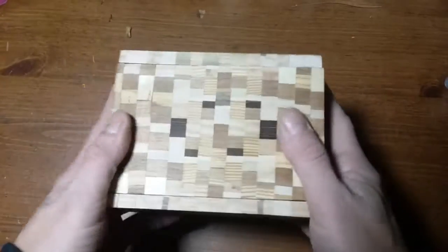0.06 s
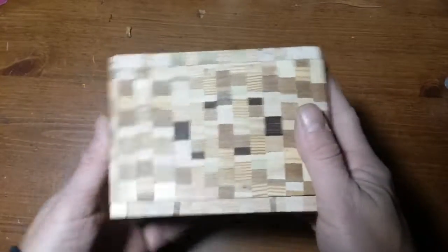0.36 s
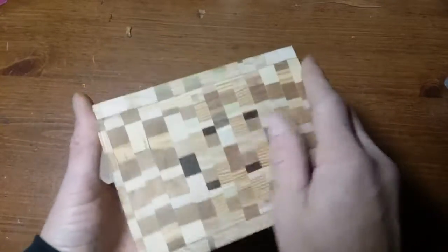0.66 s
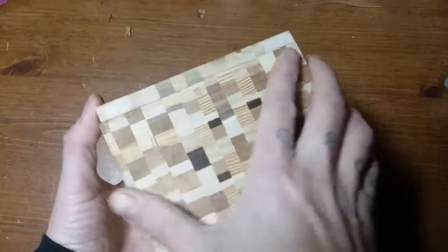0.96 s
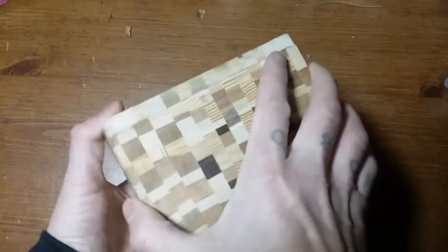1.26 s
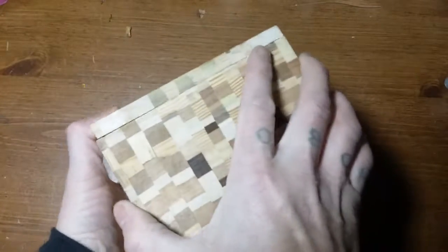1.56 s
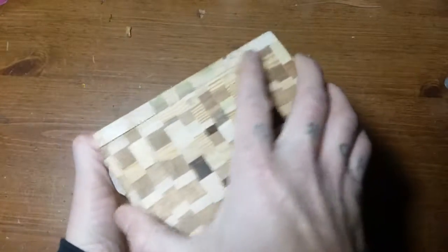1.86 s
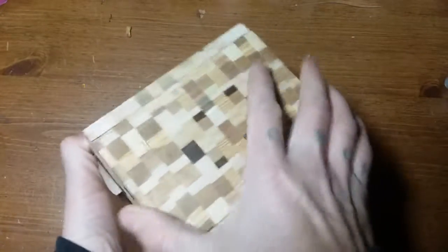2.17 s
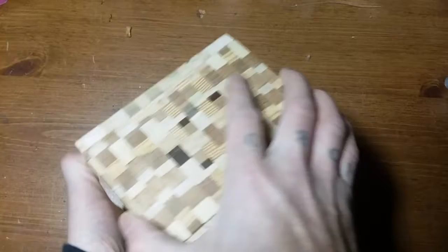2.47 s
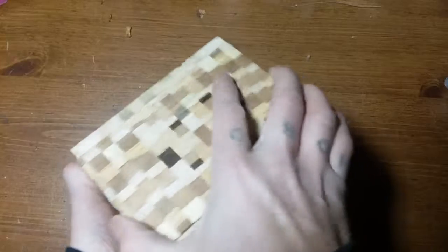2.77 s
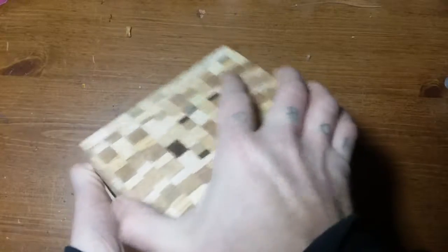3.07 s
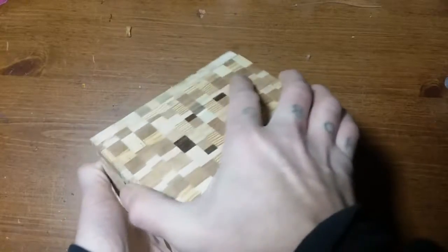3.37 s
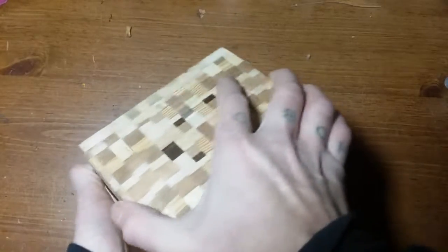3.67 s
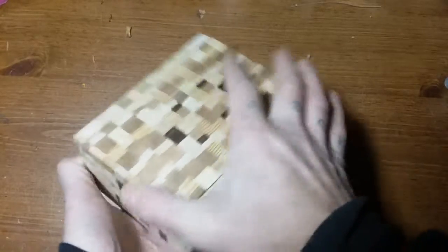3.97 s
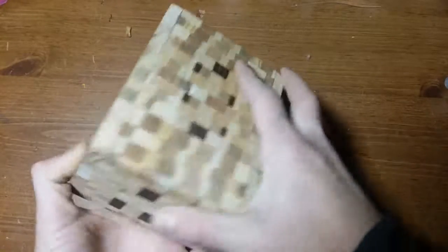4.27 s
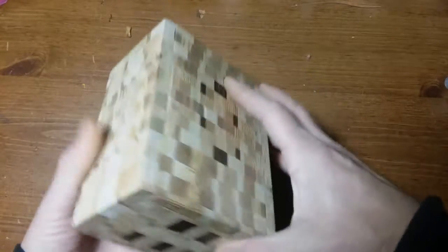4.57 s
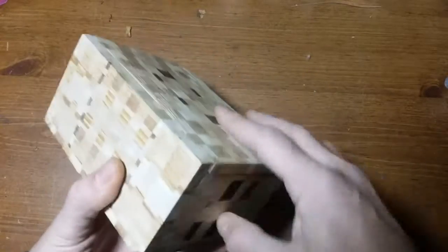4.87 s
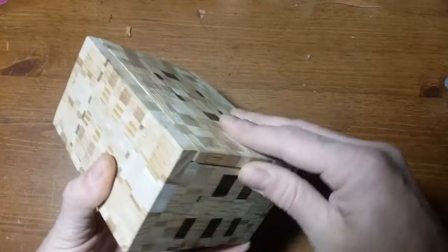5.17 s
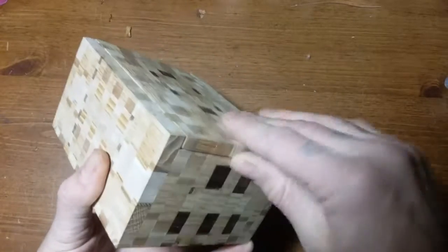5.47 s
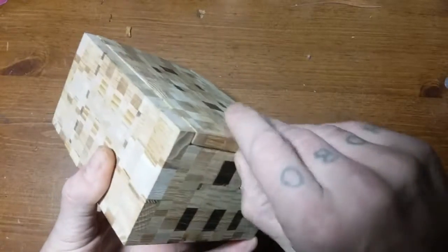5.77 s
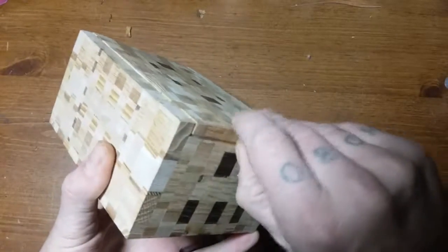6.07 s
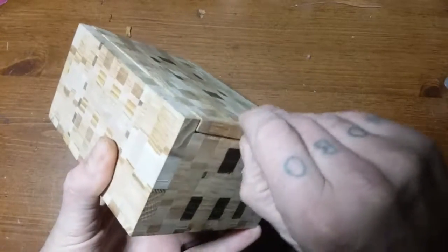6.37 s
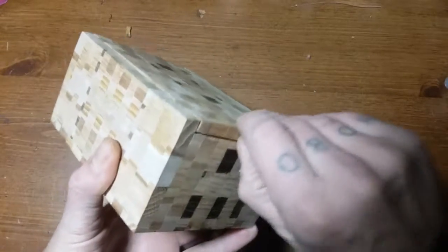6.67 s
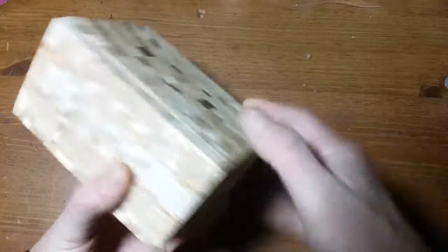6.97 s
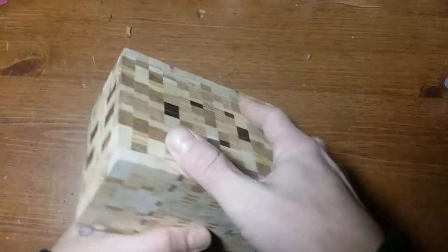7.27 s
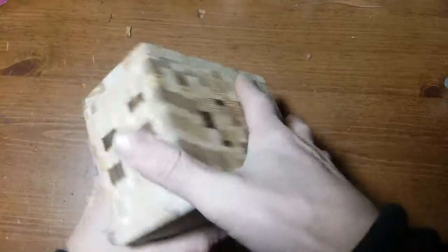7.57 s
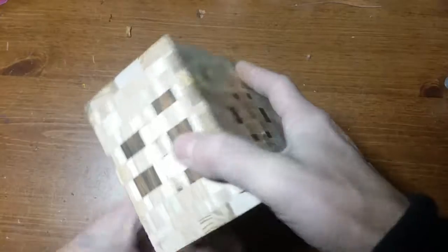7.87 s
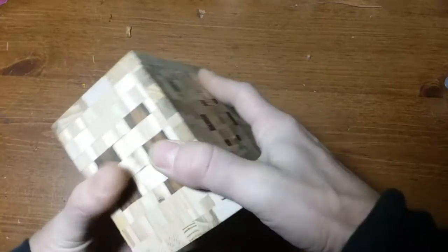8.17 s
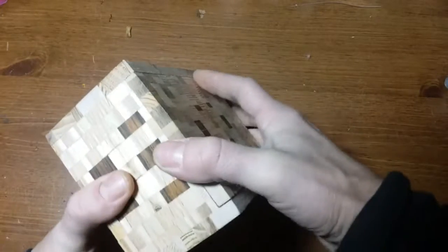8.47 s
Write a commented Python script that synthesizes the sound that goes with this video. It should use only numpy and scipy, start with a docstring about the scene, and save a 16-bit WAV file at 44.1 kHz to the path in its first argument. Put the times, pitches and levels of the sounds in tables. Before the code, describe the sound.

Loose pieces tick and knock inside a handheld wooden box as fingers softly rub and bump its sides.

```python
"""Loose pieces tick and knock inside a wooden puzzle box turned in two hands above a table in a small room.
Each impact excites the damped modes of cavity and panels. Fingers bump the box, an end panel booms
against its stop, a side panel grates in its groove and a pin drops with a short ring. Friction of skin
on wood gives a dry rubbing and one stick-slip squeak. A noise suppressor keeps the treble of the
steady background hiss lower between the knocks than during them."""
import sys
import numpy as np
from scipy import signal
from scipy.fft import rfft, irfft, next_fast_len
from scipy.io import wavfile
from scipy.ndimage import uniform_filter1d

SR = 44100
rng = np.random.default_rng(int(sys.argv[2]) if len(sys.argv) > 2 else 0)


def generate_wav(sig):
    """Save sig (samples, or channels by samples) to the path in sys.argv[1] as 16-bit PCM at SR."""
    pcm = np.round(np.clip(np.atleast_2d(sig).T, -1, 1) * 32767).astype(np.int16)
    wavfile.write(sys.argv[1], SR, pcm)


N = 375291
TIME = np.arange(N) / SR
AGE = TIME[:8192]  # time since a contact, t/s

# spectrum of the dense short modes of the glued slats: f/Hz, relative level/dB
SLAT_SPECTRUM = [(70, -26), (125, 0), (250, -1), (370, 4), (650, -4.5), (1050, -1.5), (1600, -2),
                 (2300, 5.5), (2800, 0), (3400, 2), (4700, -5), (5400, -7), (8500, -10.5)]
# spectrum of skin sliding on wood: f/Hz, relative level/dB
FRICTION_SPECTRUM = [(700, -19.5), (1050, -4), (1600, -8), (2400, -3.5), (3600, -4.5), (4700, -12),
                     (5600, -11), (8000, -16.5), (15000, -19.5)]


def knocks(slats_db=7.5, slats_t60=.11, low_slats_db=-4, crack_t60=.046, trim_db=-.5):
    """Impact excitation: a harder blow has a shorter contact time and so a brighter spectrum."""
    # thump, hollow, knock, click and crack bands of the box: lower f/Hz, upper f/Hz
    registers = [(104, 247), (292, 550), (700, 1367), (2000, 4850), (5500, 8200)]
    out = np.zeros(N)
    for s, knock, thump, hollow, click, ring in contacts():
        modes = box_modes()
        slats = from_db(slats_db) * coloured_noise(SLAT_SPECTRUM, len(AGE)) * fade(slats_t60)
        grip = fade(.05) ** (1 / np.clip(ring, .4, 1.3) - 1)  # added damping by the hands
        low = (modes + from_db(low_slats_db) * slats) * grip
        high = chatter((modes + slats) * grip)
        hardness_db = knock + click
        crack = click - 13 + .85 * np.clip(hardness_db + 20.5, -20, 10)
        click_top_hz = np.clip(4100 * 2 ** ((hardness_db + 39) / 24), 1500, 12000)  # an octave per 24 dB
        sounds = (low, low, high, filtered(high, click_top_hz, "low"), high * fade(crack_t60))
        for edges, sound, db in zip(registers, sounds, (thump, hollow, 0, click, crack)):
            band = rms_one(filtered(sound, edges, "band", order=3))
            band *= np.sqrt(.01 / AGE[-1])  # the energy of 10 ms at unit rms
            add(out, s, from_db(knock + db + trim_db) * band)
    return out


def contacts(hard_db=-47.5, tumble_ring=.53, bump_ring=.7):
    """Collisions resolved into single impacts: t/s, knock, thump, hollow, click levels/dB, ring factor."""
    # a piece lands flat: t/s, knock level/dB, thump, hollow and click levels/dB re knock,
    # ring factor (smaller is more damped)
    flat_landings = [(0.294, -51, -2.5, -16.5, -4.5, 0.39), (0.67, -49.5, 11, -3, -2.5, 0.52),
                     (1.387, -64.5, -3, -9, -1, 0.61), (1.469, -57.5, -11.0, -3.0, -10.5, 0.58),
                     (1.77, -52, -14.5, -18, 4, 0.56), (1.851, -58.5, -18.0, -4.5, -4, 1),
                     (1.933, -45, 7, -1.5, -2, 0.44), (2.041, -59.5, 1, 7, -3.5, 1),
                     (2.274, -45, -3, -12.0, -10, 0.6), (2.473, -55, 4, -2, -6, 0.62),
                     (2.762, -51, -0.5, -13, -3.5, 0.32), (2.882, -46.0, -2, 1, 2, 0.37),
                     (3.025, -45.0, -12.5, -13, -12.5, 0.28), (3.175, -50.5, 0, -6.5, -6.5, 0.42),
                     (3.355, -38, 1.5, -0.5, -0.5, 0.38), (3.452, -58.0, -1.5, -2.5, -1.5, 0.65),
                     (3.578, -33.5, -8, 1.5, 2.5, 0.27), (3.694, -56, 11, 4.5, -9, 0.52),
                     (3.777, -38, 0, 3.5, 3.5, 0.42), (3.882, -47.5, -1.0, -6.0, -7, 0.54),
                     (3.985, -32, -7.5, -3, 1.5, 0.3), (4.111, -61.5, 7.5, 5, -6.5, 0.54),
                     (4.442, -58, -29, -21, -5, 0.66), (4.796, -68, 1, -12.5, 8.5, 0.79),
                     (4.998, -45.5, -8.5, -22, 6.5, 0.71), (5.276, -67.5, 5.0, -5, -3.0, 0.96),
                     (5.322, -63, 4.5, -1.5, -1, 0.57), (5.602, -62, 5.5, -6, -1.5, 0.65),
                     (5.942, -36.5, 7.5, 6, -2, 0.42), (5.962, -49, -12, -4.5, 1, 0.81),
                     (7.259, -55.0, 7.5, -2.5, 3, 0.46), (7.312, -58.0, -5.5, 6.5, 1.5, 1),
                     (7.798, -59.5, -8, -11, -2.5, 0.36), (8.348, -50, -7.5, -15, -5, 0.31)]
    # a piece lands on an edge and rocks over: t/s, knock level/dB,
    # thump, hollow and click levels/dB re knock, delay of the second landing t/s
    tumbles = [(0.796, -55.5, 4, -2, -3, 0.017), (2.063, -50.5, -15, -3.5, -6.5, 0.0084),
               (2.149, -45.5, 4, -1, 4.5, 0.0048), (2.319, -40, 4.5, -1.5, -5.0, 0.0083),
               (2.629, -45.0, 5.5, 1.0, -1.5, 0.015), (3.144, -54.0, 1, 3, -3.5, 0.014),
               (3.248, -46.5, 3.5, 6, -4.5, 0.009), (3.483, -46, 3, 1.5, -16.5, 0.0063),
               (4.517, -43.5, 5.5, 0, 0, 0.012), (6.691, -57, 11.0, 6.0, -5, 0.0051)]
    # finger pads land on the box: t/s, thump level/dB, skin tap level/dB re thump
    finger_bumps = [(0.637, -49.5, -16), (1.592, -62, -23), (1.649, -57, -14), (2.374, -45, -10.5),
                    (2.509, -50.5, -23), (3.662, -56.5, -7), (3.911, -54, -18), (4.081, -54, -14),
                    (4.645, -41.5, -16.5), (5.065, -58.5, -7), (5.842, -51, -23), (5.897, -35.5, -22.5),
                    (6.38, -51, -18.5), (6.583, -53.5, -14.5), (7.82, -57.5, -11), (7.881, -58.0, -23),
                    (7.972, -52, -9), (8.499, -43, -14.5)]
    for s, db, thump, hollow, click, ring in flat_landings:
        yield s, db, thump, hollow, click, ring
        if db > hard_db:  # grazes the wall just before it hits
            yield s - .005, db - 15.5, thump, hollow, click - 3.5, ring
    for s, db, thump, hollow, click, rock_s in tumbles:
        yield s - .007, db - 12, thump, hollow, click - 9.5, tumble_ring  # brushes the wall first
        yield s, db - 1, thump, hollow, click, tumble_ring
        yield s + rock_s, db - 4.5, thump, hollow, click, tumble_ring
    for s, db, tap in finger_bumps:
        yield s, db + tap, -tap, -11.5 - tap, -2, bump_ring


def box_modes(scatter=.78, detune=.013, whole_box_hz=550):
    """Modal superposition: low modes answer much alike everywhere, panel modes vary with the spot hit."""
    # cavity and panel modes: f/Hz, relative level/dB
    modes = [(135, 8), (173, 7.5), (215, 0.5), (262, -7.5), (330, 5), (385, 6.5), (605, -6.5), (830, 0.5),
             (1025, 6.5), (1220, -1), (1400, 5.5), (1555, 8), (1730, 1.5), (2030, -1), (2400, 3), (3135, 3),
             (3450, -4), (3780, -3), (4520, 2), (4780, 2.5), (6360, -2), (7850, -6)]
    hz, db = np.transpose(modes)
    strength, shift = rng.standard_normal((2, len(hz)))
    low_weights = (-1) ** np.arange(len(hz)) * (1 + .5 * scatter * strength)
    panel_weights = rng.choice([-1, 1], len(hz)) * (1 + scatter * strength)
    weights = np.where(hz < whole_box_hz, low_weights, panel_weights)
    t60 = .052 * (hz / 150) ** -.12  # hand-held wood dies fast, the high modes first
    return weights @ rings(zip(hz * (1 + detune * shift), db, t60))


def chatter(sound, bounce_s=.0011, bounce_db=1):
    """Elastic rebound: a piece bounces three times within milliseconds before it settles."""
    gaps = bounce_s * rng.uniform(.5, 2, size=3)
    sizes = from_db(bounce_db) * rng.uniform(-.66, 1, size=3)
    out = sound.copy()
    for s, size in zip(np.cumsum(gaps), sizes):
        add(out, s, size * sound)
    return out


def panel_stop(radiate_hz=135):
    """Sudden deceleration of the end panel excites the low modes; a small box radiates no deep bass."""
    # low modes of the whole box: f/Hz, relative level/dB, T60/s
    boom_modes = [(135, -25.5, 0.094), (175, -18.5, .065), (215, -18.5, .055), (329, -18, 0.066),
                  (411, -23.5, .05)]
    # the panel meets its stop and rebounds: t/s, relative level/dB
    impacts = [(5.9421, 2), (5.972, -16.5)]
    boom = (-1) ** np.arange(len(boom_modes)) @ rings(boom_modes)
    radiated = filtered(boom, radiate_hz, "high", order=6)
    out = np.zeros(N)
    for s, db in impacts:
        add(out, s, from_db(db) * radiated)
    return out


def grating(grit_hz=300, grit_db=2.5):
    """Dry friction of wood on wood: the grain of panel and groove catches in quick, uneven slips."""
    # a side panel moves in its groove: start t/s, duration/s, level/dB
    slides = [(2.14, 0.069, -68), (2.28, 0.091, -63), (2.315, 0.014, -59), (2.632, 0.011, -69)]
    grit = wander(grit_hz, grit_db) * coloured_noise(SLAT_SPECTRUM)
    return strokes(slides) * rms_one(filtered(grit, [800, 5500], "band"))


def pin():
    """Free vibration after impact: a small hard pin lands with a tick, rings and bounces once."""
    # landing and bounce: t/s, relative level/dB
    landings = [(4.9985, -46), (5.023, -52.5)]
    # modes rung by the pin: f/Hz, relative level/dB, T60/s
    modes = [(785, -2, 0.068), (800, 4, 0.07), (1302, 6.5, 0.071), (1560, -3, 0.055), (2300, -0.5, 0.062),
             (3000, -17, .035), (3420, 6.5, 0.055), (4300, -22, 0.034)]
    ring = rings(modes).sum(axis=0)
    out = np.zeros(N)
    for s, db in landings:
        noise = filtered(rng.standard_normal(len(AGE)), [700, 4300], "band", order=3)
        tick = rms_one(noise) * fade(.04)
        add(out, s, from_db(db) * (ring + tick))
    return out


def squeak(start_s=4.686, slip_hz=1400, level_db=-27, scrape_db=-22):
    """Stick-slip: a fingertip briefly drives the panel near a resonance, inside its own dry scrape."""
    # driven panel modes: f/Hz, relative level/dB, T60/s
    modes = [(1388, 6.5, 0.053), (1424, 6, 0.063), (1560, -22, 0.035), (1710, -1, 0.066),
             (1910, -14, 0.041), (2450, -5.5, 0.082), (3030, -10, 0.065), (3920, -27, .035)]
    pressure = stroke(start_s, length=.0065, attack_s=.0067, release_s=.0038)
    force = (np.sin(2 * np.pi * slip_hz * TIME) + 7 * rng.standard_normal(N)) * pressure
    vibration = signal.oaconvolve(force, rings(modes).sum(axis=0))[:N]
    tone = filtered(vibration, 1060, "high", order=4)
    friction = filtered(coloured_noise(FRICTION_SPECTRUM), [1200, 3800], "band", order=3)
    scrape = from_db(scrape_db) * np.sqrt(pressure) * friction
    return from_db(level_db) * (tone / np.abs(tone).max() + scrape)


def rubbing(catch_hz=60, catch_db=1.5, grain_hz=500, grain_db=1, hiss_db=-4, drag_db=-.5):
    """Sliding friction: skin catches unevenly, with a hiss in the panel resonances and a low drag."""
    # broad panel resonances: f/Hz, bandwidth/Hz, relative level/dB
    resonances = [(990, 173, -6.5), (1244, 110, 4.5), (1650, 78.4, 1.5), (2300, 280, -0.5),
                  (3160, 310, -3.5), (2960, 200, -1), (3885, 220, -2.5), (4300, 720, -1.5)]
    # the hands keep shifting on the box: start t/s, duration/s, relative hiss and drag levels/dB
    handling = (2.28, 4, -76, -82)
    # single slides of skin on wood: start t/s, duration/s, relative hiss and drag levels/dB
    rubs = [(0.0, 0.38, -72, -88), (0.488, 0.25, -69, -87), (0.684, .4, -64, -81), (0.896, 0.054, -68, -84),
            (1.009, 0.023, -60.5, -73), (1.107, 0.12, -66, -79.5), (1.28, 0.12, -71.5, -81.5),
            (4.213, 0.052, -66.5, -89), (4.37, 0.47, -71, -86), (4.64, 0.071, -78, -83),
            (4.937, 0.21, -69.5, -97), (5.663, 0.1, -72, -70), (6.1, 0.76, -87.5, -88),
            (7.108, 0.42, -74.5, -91), (7.234, 0.11, -62.5, -68.5), (7.294, 0.027, -62.5, -68),
            (7.478, 0.24, -69.5, -74.5), (7.34, 0.071, -67.5, -84), (7.542, 0.022, -62.5, -66.5),
            (7.974, 0.056, -64, -79), (8.018, 0.017, -61.5, -83), (8.21, 0.017, -69.5, -83.5)]
    panels = np.zeros(N)
    for hz, width, db in resonances:
        b, a = signal.iirpeak(hz, hz / width, fs=SR)
        resonance = signal.lfilter(b, a, rng.standard_normal(N))
        panels += from_db(db) * resonance * wander(hz=14, db=3.5)  # comes and goes as the finger moves
    panels = rms_one(filtered(panels, 5200, "low", order=4))
    friction = coloured_noise(FRICTION_SPECTRUM) + from_db(-.5) * panels
    hiss = rms_one(friction * wander(grain_hz, grain_db))
    # spectrum of skin dragging under pressure: f/Hz, relative level/dB
    drag_spectrum = [(200, -28.5), (320, -4.5), (420, 5), (560, -4), (800, -17), (1200, -46)]
    drag = coloured_noise(drag_spectrum)
    moves = [handling, *rubs]
    hiss_gain = strokes((start, length, db + hiss_db) for start, length, db, _ in moves)
    drag_gain = strokes((start, length, db + drag_db) for start, length, _, db in moves)
    return wander(catch_hz, catch_db) * (hiss_gain * hiss + drag_gain * drag)


def swish(band_hz=(3300, 6100)):
    """Friction under light load: a palm barely touching the wood hisses only in the treble."""
    # a quick brush of the palm: start t/s, duration/s, level/dB
    brushes = [(4.215, .04, -75)]
    return strokes(brushes) * rms_one(filtered(rng.standard_normal(N), band_hz, "band", order=3))


def room(x, tail_db=-11.5, t60=.12, onset_s=.0034, wall_hz=5500):
    """Reverberation: the direct sound is followed by early reflections and a short, dull diffuse tail."""
    # reflections from table top and walls: delay t/s, level/dB re direct sound
    reflections = [(.0027, -28), (0.0118, -17), (0.0223, -20.5)]
    build_up = np.minimum(AGE / onset_s, 1) ** 2
    tail = filtered(rng.standard_normal(len(AGE)), wall_hz, "low") * fade(t60) * build_up
    passband_gain = np.sqrt(np.sum(tail ** 2) * SR / (2 * wall_hz))
    response = from_db(tail_db) * tail / passband_gain
    for delay, db in reflections:
        response[int(delay * SR)] += from_db(db)
    return x + signal.oaconvolve(x, response)[:N]


def background_hiss(db):
    """Stationary broadband noise: a steady hiss over a faint rumble."""
    # spectrum of the noise floor: f/Hz, relative level/dB
    floor_spectrum = [(12, -31.5), (20, -6.5), (27, -11.5), (130, -4), (187, -6.5), (345, -13.5),
                      (539, -17), (819, -16.5), (1110, -20), (1210, -18.5), (2370, -24), (3220, -26.5),
                      (4020, -28.5), (9040, -24.5), (15800, -23)]
    return from_db(db) * coloured_noise(floor_spectrum)


def suppressor(x, split_hz=7500, closed_db=-69, slope=.37, range_db=12.5, release_db_per_s=500):
    """Dynamic expansion: treble gain rises from unity with the level below 5 kHz, then soon falls back."""
    power = uniform_filter1d(filtered(x[0], [100, 5000], "band") ** 2, size=256)
    level_db = 10 * np.log10(np.abs(power) + 1e-12)
    release_db = release_db_per_s * TIME
    held_db = np.maximum.accumulate(level_db + release_db) - release_db  # peaks sink at the release rate
    opening = from_db(np.clip(slope * (held_db - closed_db), 0, range_db))
    treble = signal.sosfiltfilt(signal.butter(2, split_hz, "high", fs=SR, output="sos"), x)
    return x + (opening - 1) * treble


def rings(modes):
    """Damped harmonic oscillators: one decaying sine per row of f/Hz, level/dB, T60/s."""
    return np.array([from_db(db) * np.sin(2 * np.pi * hz * AGE) * fade(t60) for hz, db, t60 in modes])


def fade(t60):
    """Exponential decay by 60 dB in t60 seconds."""
    return np.exp(-np.log(1000) * AGE / t60)


def stroke(start, length, attack_s=.02, release_s=.019):
    """Envelope of one sliding movement: exponential swell, hold, exponential decay."""
    swell = (TIME - start) / attack_s
    decay = (start + length - TIME) / release_s
    return np.exp(np.clip(np.minimum(swell, decay), -30, 0))


def strokes(rows):
    """Incoherent addition: overlapping strokes (start t/s, duration/s, level/dB) sum in power."""
    return np.sqrt(sum((from_db(db) * stroke(start, length)) ** 2 for start, length, db in rows))


def wander(hz, db):
    """Random amplitude modulation: a gain that drifts by about db, up to hz times a second."""
    drift = rms_one(filtered(rng.standard_normal(N), hz, "low"))
    return from_db(db * np.clip(drift, -2.5, 2.5))


def coloured_noise(points, size=N):
    """Spectral shaping: unit-rms noise that follows points of f/Hz, level/dB and is cut off beyond them."""
    hz, db = np.transpose(points)
    padded = next_fast_len(size)
    log_hz = np.log(np.maximum(np.fft.rfftfreq(padded, 1 / SR), 1))
    shape = from_db(np.interp(log_hz, np.log(hz), db, left=-np.inf, right=-np.inf))
    spectrum = rfft(rng.standard_normal(padded)) * shape
    return rms_one(irfft(spectrum, padded)[:size])


def filtered(x, hz, kind, order=2):
    """Causal Butterworth filter."""
    return signal.sosfilt(signal.butter(order, hz, kind, fs=SR, output="sos"), x)


def add(track, s, sound):
    """Linear superposition of a sound on a track at s seconds."""
    i = int(round(s * SR))
    track[i:i + len(sound)] += sound[:len(track) - i]


def from_db(db):
    """Level to amplitude ratio."""
    return 10 ** (np.asarray(db) / 20)


def rms_one(x):
    """Normalisation to unit rms."""
    return x / np.sqrt(np.mean(x ** 2) + 1e-30)


def scene(floor_db=-72, side_db=-14.5, side_hiss_db=-33):
    """Mid-side stereo, nearly mono: the box is central and the two channels are almost alike."""
    box = knocks() + panel_stop() + grating() + pin() + squeak()
    mid = room(box) + rubbing() + swish() + background_hiss(floor_db)
    treble_trace = filtered(room(box) - box, 900, "high")
    side = from_db(side_db) * treble_trace + background_hiss(floor_db + side_hiss_db)
    return np.array([mid + side, mid - side])


def record(dry, cutoff_hz=15900):
    """Band limiting: a steep elliptic low-pass follows the noise suppressor."""
    low_pass = signal.ellip(12, .1, 70, cutoff_hz, fs=SR, output="sos")
    return signal.sosfilt(low_pass, suppressor(dry))


dry = scene()
out = record(dry)
generate_wav(out)
```